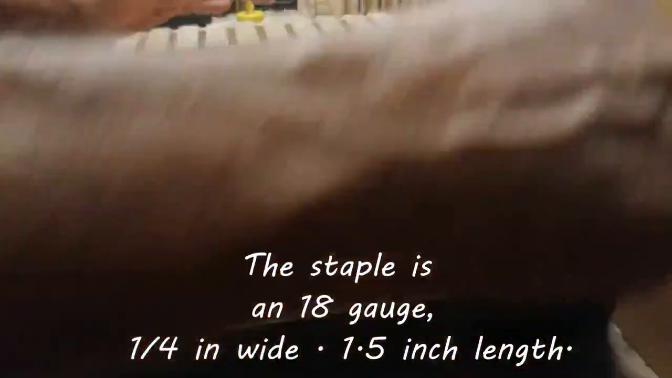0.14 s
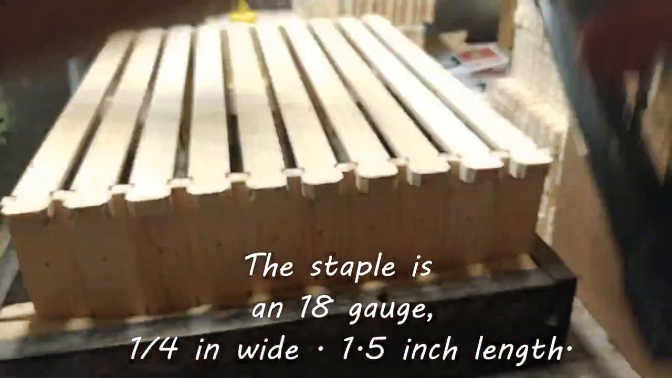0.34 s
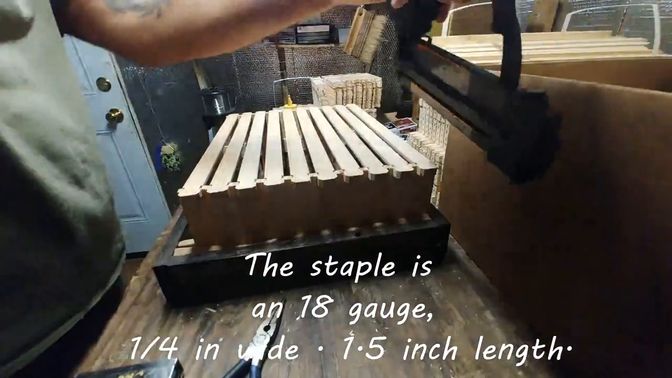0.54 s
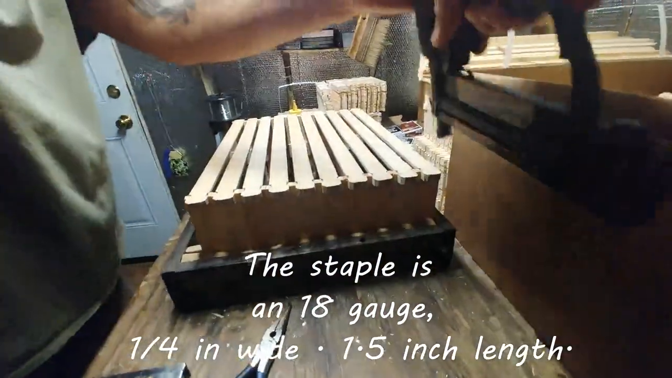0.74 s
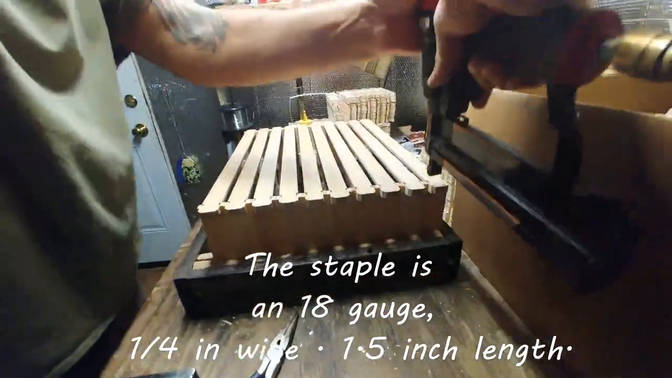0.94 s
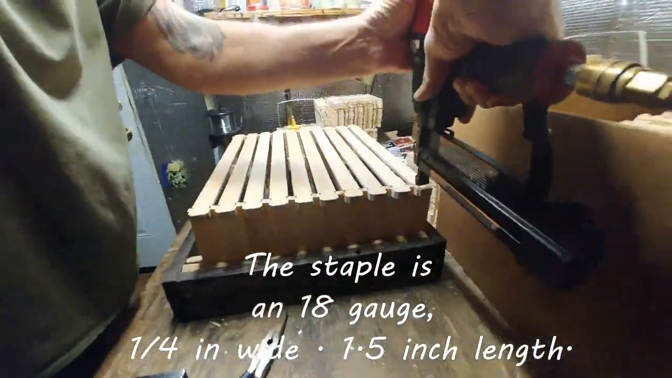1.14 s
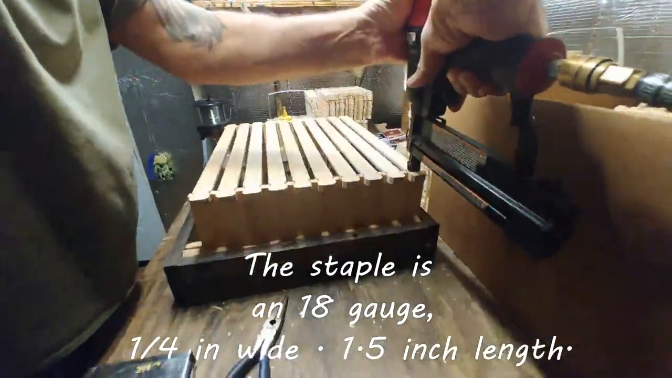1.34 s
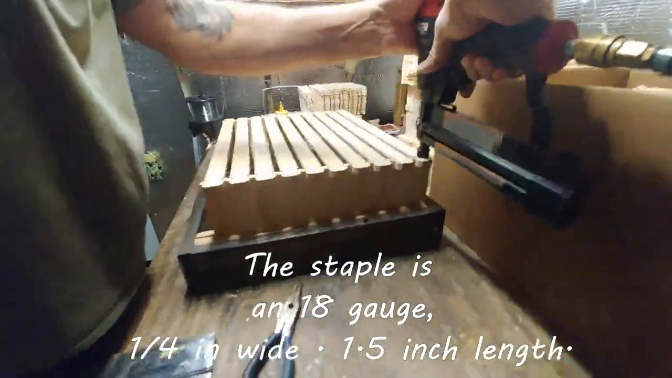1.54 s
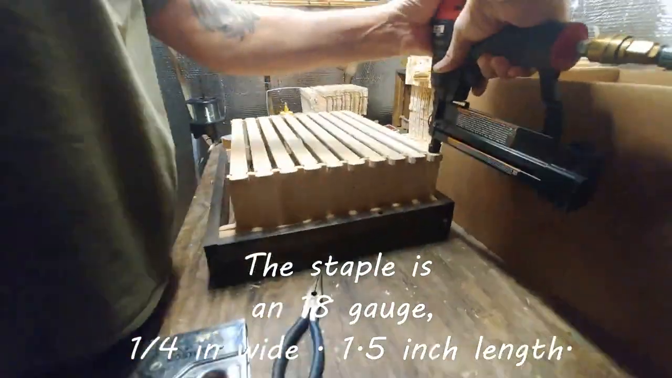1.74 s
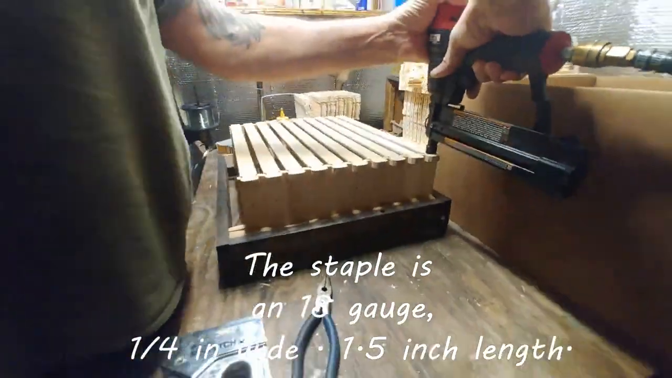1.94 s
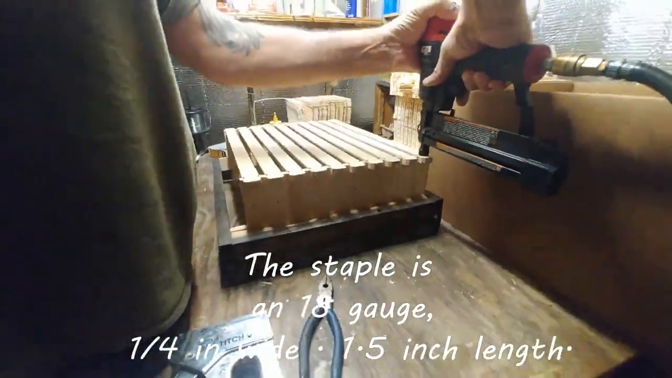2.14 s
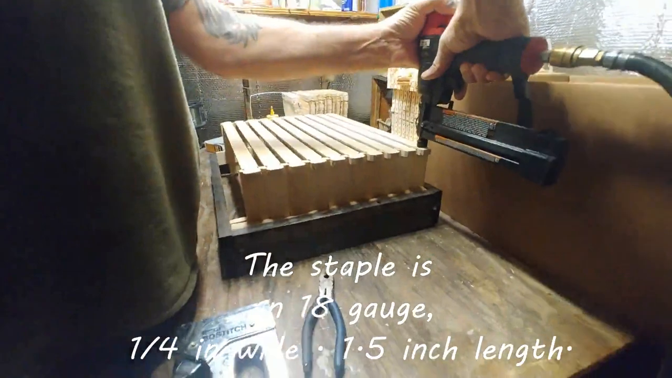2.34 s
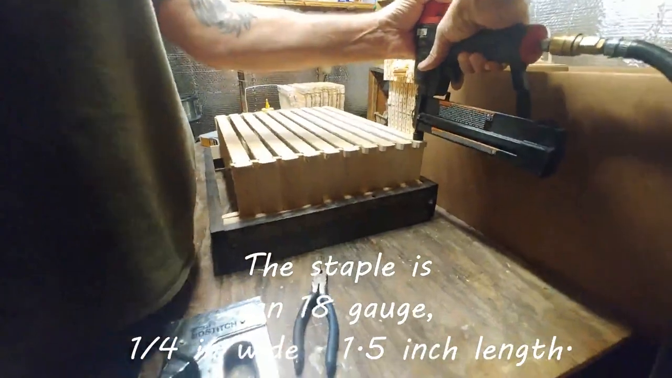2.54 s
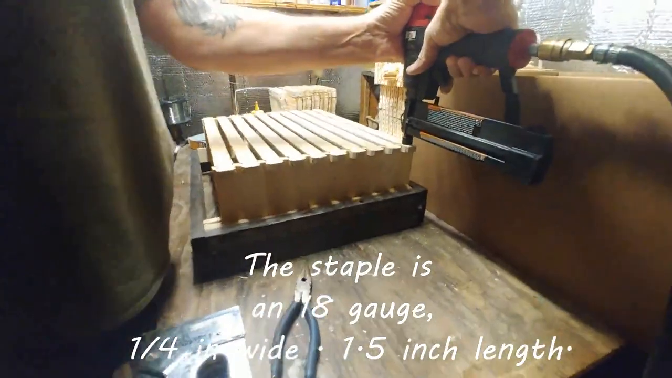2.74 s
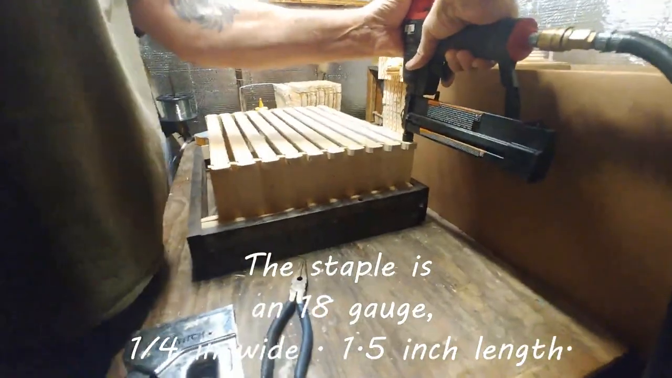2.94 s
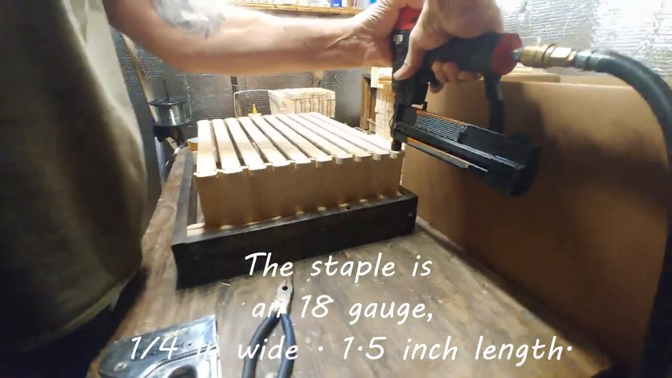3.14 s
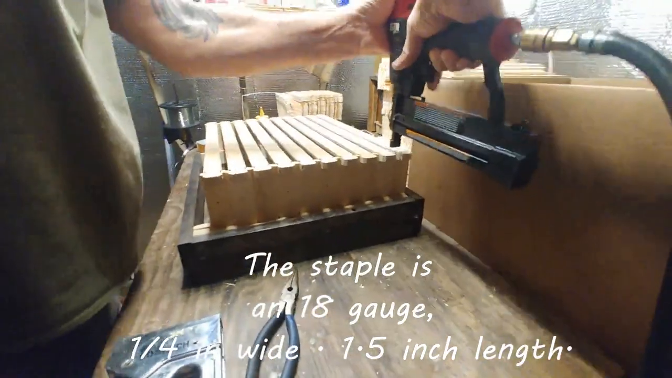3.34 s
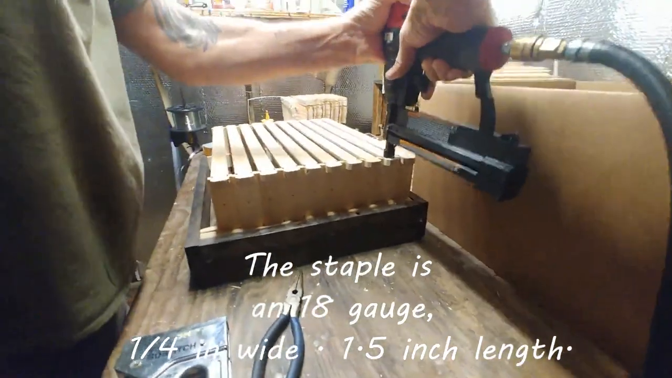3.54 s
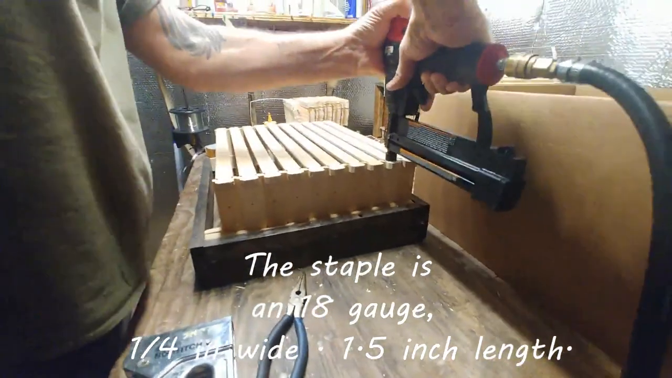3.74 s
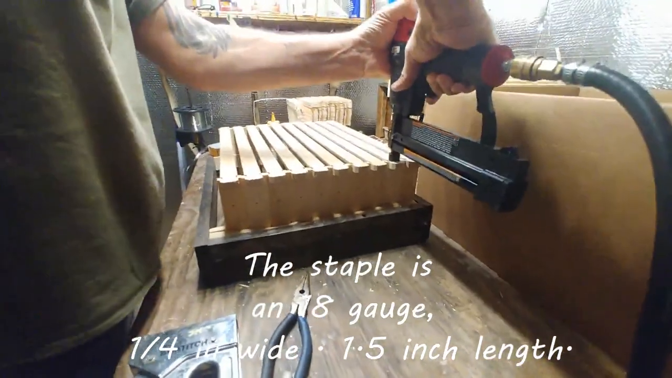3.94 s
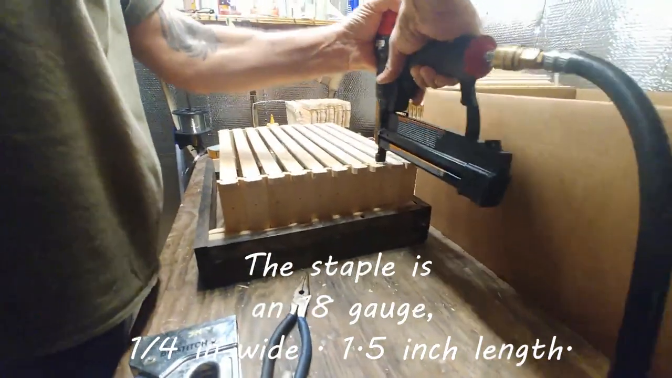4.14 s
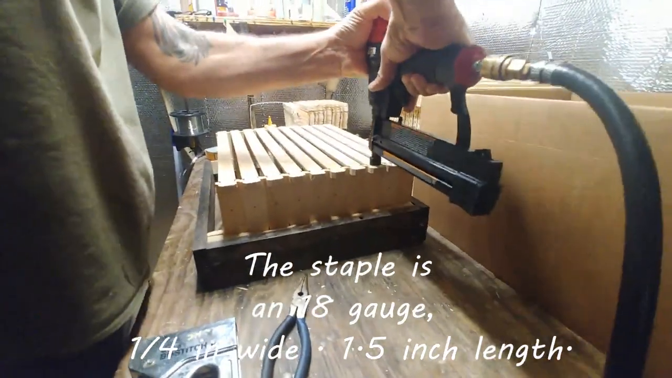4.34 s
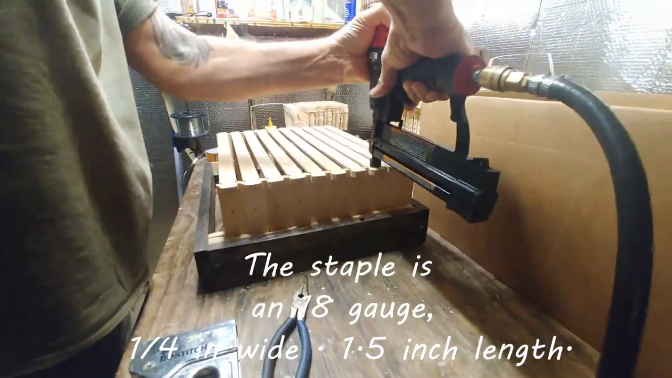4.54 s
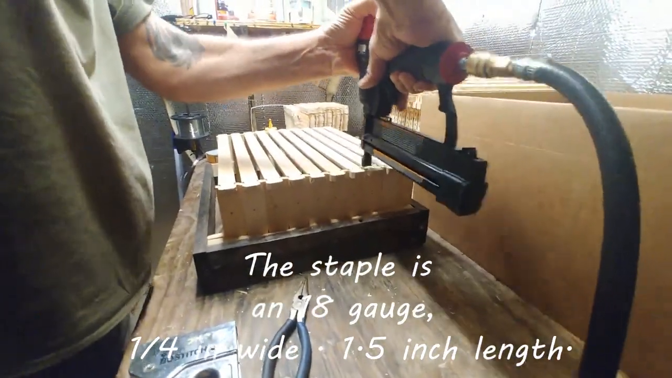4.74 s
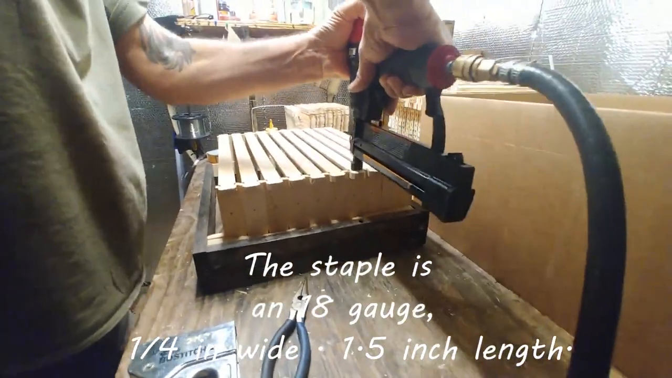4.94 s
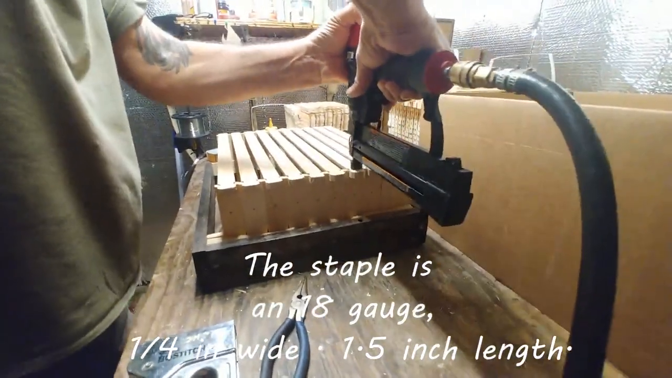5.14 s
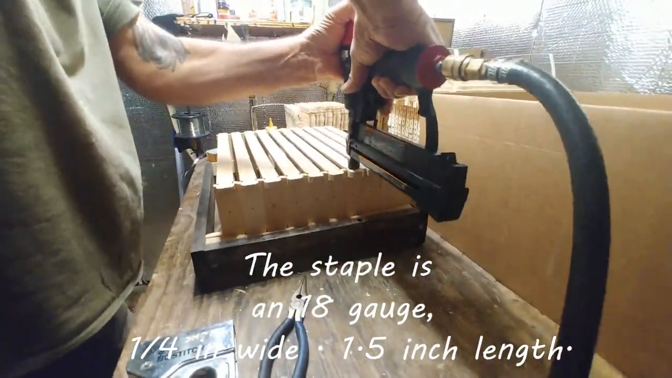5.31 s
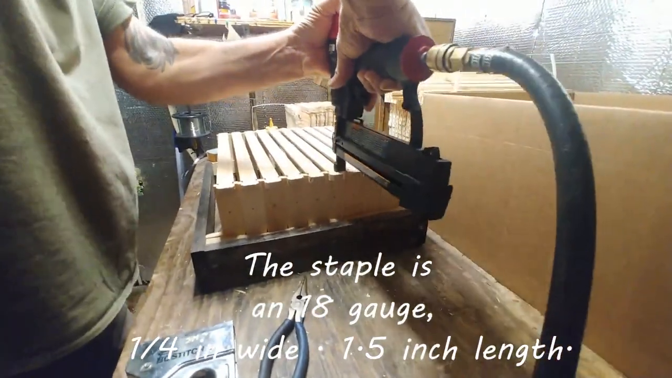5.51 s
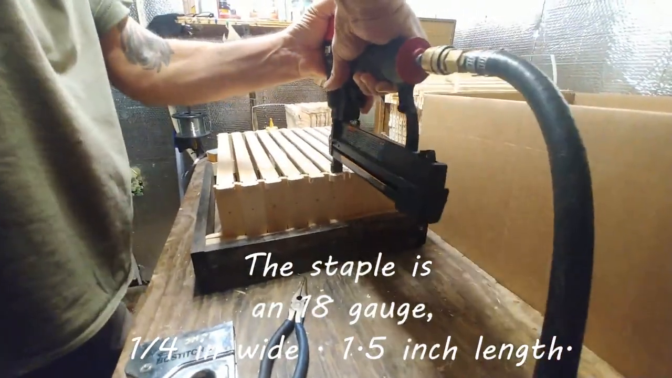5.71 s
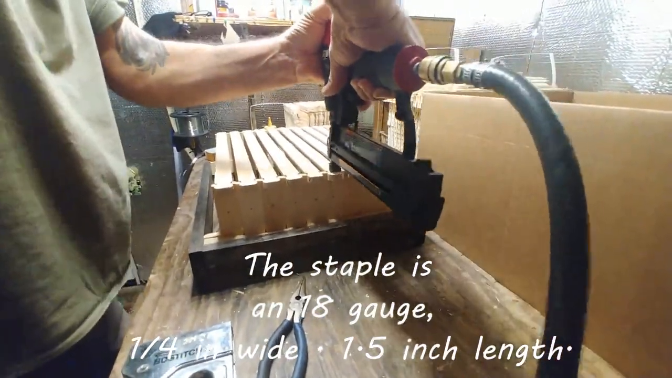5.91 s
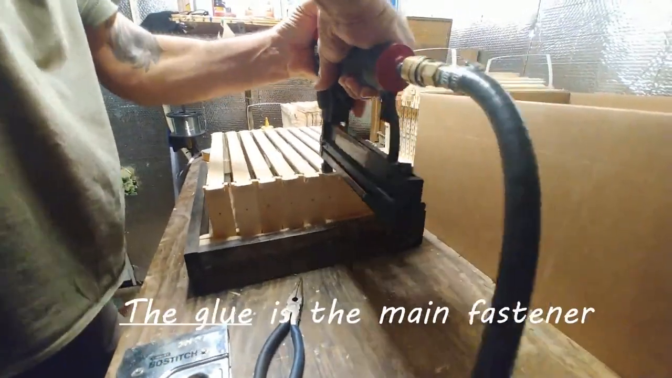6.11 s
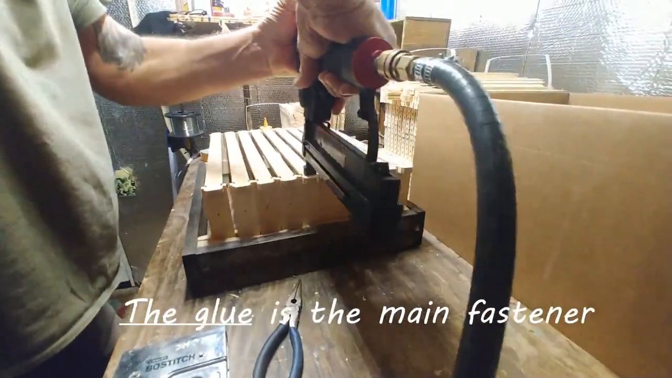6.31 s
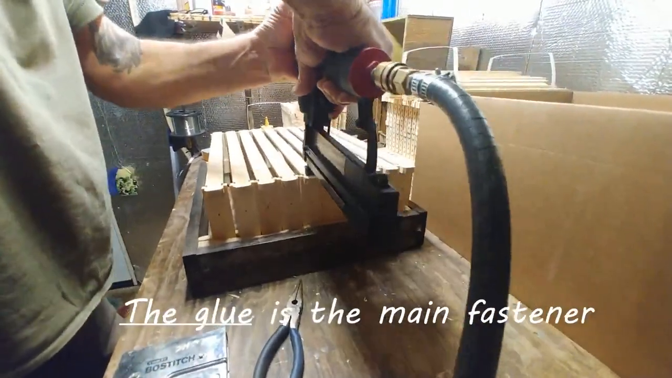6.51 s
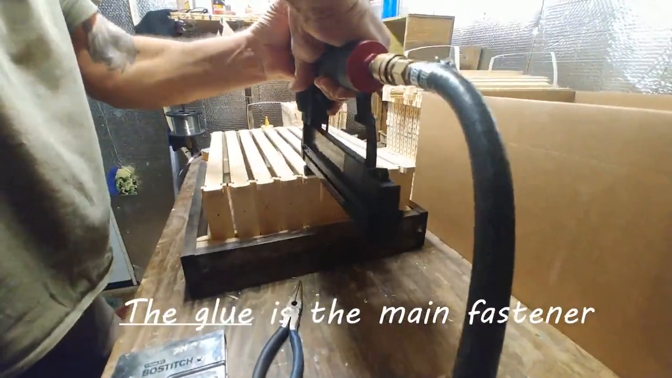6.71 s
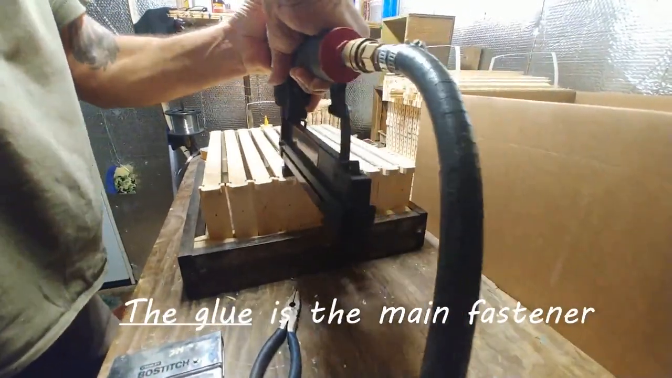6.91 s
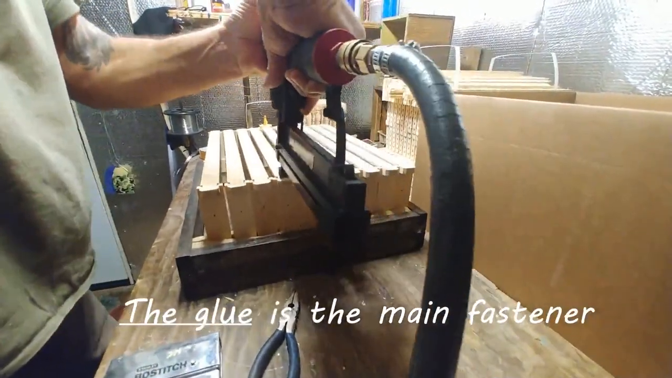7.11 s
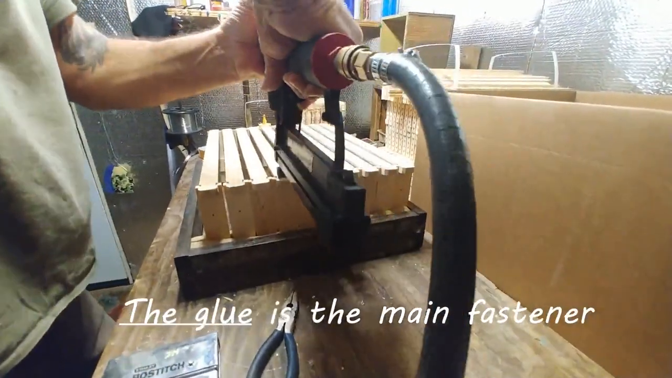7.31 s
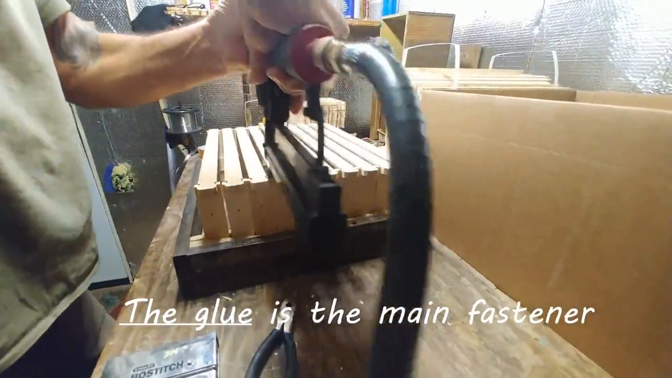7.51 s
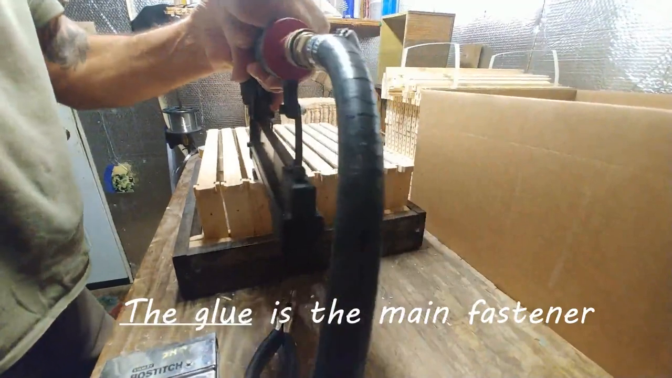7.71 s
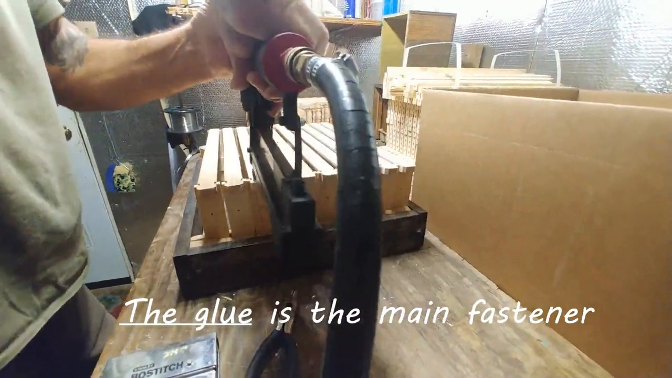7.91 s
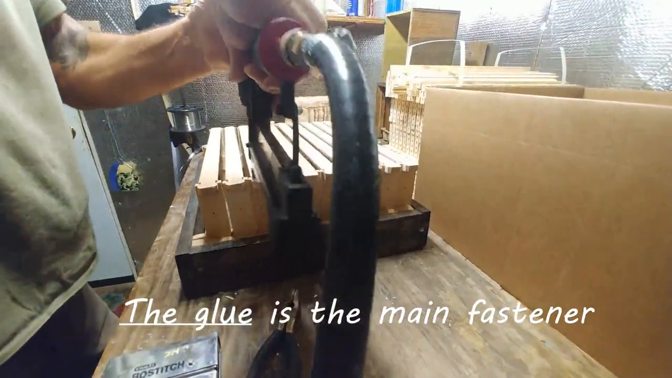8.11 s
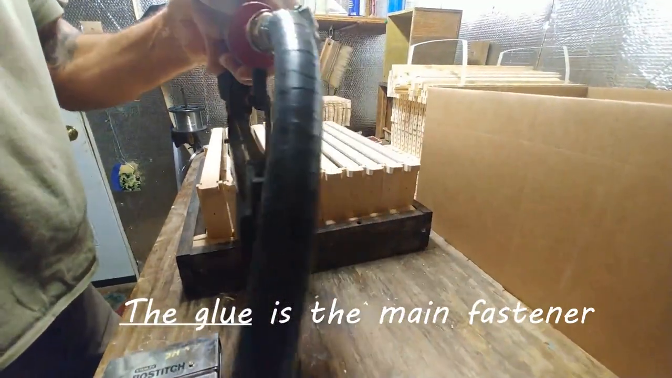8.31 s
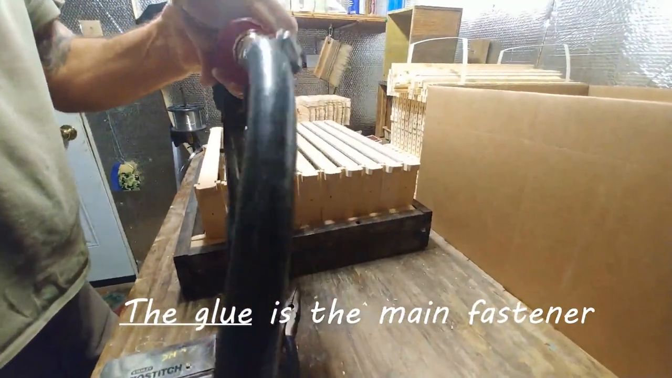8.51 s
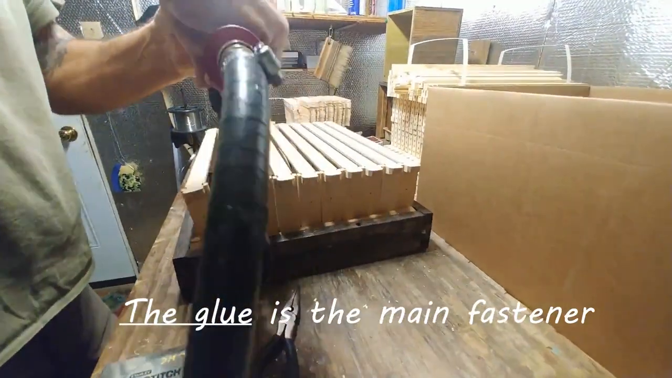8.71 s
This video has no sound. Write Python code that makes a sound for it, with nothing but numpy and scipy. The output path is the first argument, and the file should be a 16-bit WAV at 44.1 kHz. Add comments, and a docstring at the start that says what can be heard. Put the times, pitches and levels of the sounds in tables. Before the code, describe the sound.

After three seconds of quiet knocking and rustling, an air stapler cracks nine times at near-steady intervals, puffing out air after each blow.

```python
"""Small workshop: an air stapler drives nine staples into softwood frames on a bench, a hand's length away.
At first the camera is shifted by hand; the nose taps and slides on the wood, with more taps between shots.
Each shot: air rushes in (ringing noise), the driver slams and rebounds (damped sines), frame, bench and steel ring.
On release the exhaust pops and hisses (coloured noise) and the piston clacks back. The room adds decaying noise tails."""
import sys
import numpy as np
from scipy import signal
from scipy.fft import rfft, irfft, next_fast_len
from scipy.io import wavfile

SR = 44100
rng = np.random.default_rng(int(sys.argv[2]) if len(sys.argv) > 2 else 0)


def digitize_waveform(pressure):
    """Quantize a signal to 16-bit integers and store it at the path in sys.argv[1].

    Rows of a 2-D input are taken as channels; values are limited to [-1, 1].
    """
    field = np.atleast_2d(pressure).T
    bounded = np.clip(field, -1, 1)
    quanta = np.round(bounded * 32767).astype(np.int16)
    wavfile.write(sys.argv[1], SR, quanta)


def to_linear_factor(level_db):
    """Convert decibel levels (scalar or array-like) to linear amplitude factors."""
    exponent = np.asarray(level_db, float) / 20
    return 10 ** exponent


N = 390726
HZ = np.fft.rfftfreq(N, 1 / SR) + 1   # +1 keeps the logarithm finite

# shots, timed at the onset of the air rush: start_s, blow_db, rush_hz, stroke_ms, leak_db
SHOTS = [(3.2160, -2, 4300, 8.2, -45), (3.9679, -2, 3700, 7.2, -50), (4.6010, -2.5, 4300, 7.7, -52),
         (5.2293, -3, 3000, 7.6, -49), (6.0058, -3.5, 3700, 7.3, -54), (6.6607, -3.5, 2700, 7.4, -52),
         (7.3952, -2.5, 2900, 7.4, -29), (8.0278, -2, 3400, 7.3, -58), (8.7098, -3, 3250, 6.9, -58)]
# trigger releases: start_s, exhaust_db, clack_db
RELEASES = [(3.3148, -7.5, -18.5), (4.0902, -6, -14.5), (4.7159, -7.5, -17.5), (5.364, -7, -18),
            (6.1184, -7.5, -15), (6.8002, -7.5, -16), (7.5318, -7.5, -20), (8.1406, -7.5, -16.5),
            (8.841, -5, -14)]
# nose, trigger and hands on wood and steel: start_s, knock_db, knock_hz, tick_db, bright_minus_dull_db
TAPS = [(0.082, -32.5, 416, -46.5, -2), (0.249, -32.5, 433, -38, -17), (0.457, -19.5, 296, -42.5, -5),
        (0.526, -26.5, 338, -57, 2), (0.631, -39, 410, -53.5, 6.5), (0.798, -43.5, 250, -45.5, 12),
        (1.01, -61, 288, -46, -0.5), (1.457, -47.5, 480, -64, -12), (1.475, -34, 760, -35.5, -0.1),
        (2.066, -44.5, 556, -38.5, -5), (2.138, -55, 840, -50, 0.5), (2.276, -22, 260, -30.5, -5),
        (2.305, -37, 510, -40.5, -13), (2.761, -33, 431, -35, -7.5), (2.778, -43.5, 420, -41, -2),
        (2.837, -47, 652, -32, -5), (3.066, -42, 487.4, -44.5, -13), (3.074, -27.5, 440, -42.5, -13),
        (3.107, -45.5, 334, -33, 7), (3.162, -52, 699, -40.5, -2), (3.170, -31.5, 415, -31.5, -0.5),
        (3.641, -39, 561, -45, 6), (3.693, -41.5, 322, -51, 7.5), (3.79, -30, 244, -59, -20),
        (3.914, -54, 1140, -40, -0.2), (4.315, -41, 264, -43, 3.5), (4.483, -24.5, 264, -44, 5.5),
        (4.514, -38.5, 410, -38.5, -2.8), (4.998, -43, 503, -41, -1.2), (5.122, -39, 414, -51, -7.5),
        (5.143, -25, 320, -32, 0.5), (5.574, -49.5, 418, -44, 1.9), (5.885, -47, 250, -59, 0),
        (5.922, -25.5, 345, -35.5, 5.5), (5.949, -27.5, 393, -37, -8), (6.36, -46.5, 412, -45.5, -3.5),
        (6.54, -45, 336, -51.5, -3), (6.57, -25.5, 323, -37, 2), (7.255, -41.5, 315, -51.5, -3.5),
        (7.75, -54, 336, -44, -8), (7.962, -27.5, 317, -35, -2.5), (8.493, -43.5, 930, -45.5, -4.5),
        (8.604, -35.5, 296, -44.5, 0), (8.622, -34.5, 427, -39, -12)]
# camera shifted by hand: time_s, rustle_db, scuff_db, rumble_db
HANDLING = [(0.0, -62.5, -68.5, -74), (0.102, -54.5, -59.5, -38.5), (0.24, -50, -53, -44),
            (0.255, -48.5, -45.5, -47.5), (0.36, -48.5, -52.5, -47.5), (0.395, -37.5, -44.5, -41.5),
            (0.425, -42.5, -50.5, -45), (0.445, -55.5, -53.5, -41.5), (0.475, -52, -43, -29),
            (0.612, -70, -59, -44.5), (0.636, -56.5, -48, -40.5), (0.72, -48, -50.5, -35.5),
            (0.78, -55.5, -61.5, -50), (0.912, -53.5, -51, -44.5), (1.004, -57.5, -60, -44.5),
            (1.14, -94, -82, -69.5)]
# camera case bumped and creaking: start_s, level_db, left_minus_right_db, pitch_hz, t60_s
CASE_BUMPS = [(0.713, -24, -13, 71.7, .05), (.977, -24, 17.5, 943, 0.0026)]
# nose sliding along the wood: time_s, level_db
SLIDE = [(2.42, -66), (2.47, -53), (2.5, -46.5), (2.526, -36.5), (2.72, -37), (2.785, -47.5), (2.81, -67)]
# low unrest of the bench: time_s, level_db
UNREST = [(0.0, -63), (0.9, -49), (1.2, -61.5), (1.85, -67), (2.34, -55.5), (3.1, -59.5), (3.6, -62.5),
          (3.75, -49.5), (4.2, -58), (8.86, -58)]

# modes of the free frame: pitch_hz, level_db, t60_s
FRAME = [(252, -9, 0.22), (312.6, -4, 0.14), (412, -4, 0.17), (434.8, -5.5, 0.26), (602, 7.5, 0.0069),
         (808, -2, 0.096), (529, -7, 0.26), (881.5, 2, 0.12), (1005, 4, 0.064), (1176, 5.5, 0.025),
         (1282, 2, 0.055), (1770, -1, 0.035), (1990, -10, 0.019), (2620, -15.5, .03)]
# modes of the bench: pitch_hz, level_db, t60_s
BENCH = [(72.5, -11.5, 0.22), (127.9, 1.5, 0.26), (165, -4, 0.15), (193, -12, 0.46)]
# modes of the steel tool body: pitch_hz, level_db, t60_s
STEEL = [(904, -7, 1.4), (1131, -5, 1.5), (1138, 0, 1.8), (1556, -12, 1.2), (1771, -10, 1.2),
         (2288, -12, 1.2), (3461, -2, 1.6), (3558, -4, 1.4), (4657, -6, .9)]

# exhaust jet spectrum: freq_hz, density_db_per_hz
EXHAUST = [(88, -29), (150, -15.5), (264, -16.5), (637, -14), (1040, -6.5), (1630, -8), (2360, -1),
           (2810, -9), (3770, 0.5), (4950, -2.5), (6390, -12), (7320, -8), (8560, -5), (11900, -20),
           (16000, -37.5)]
# blow and clack spectrum: freq_hz, density_db_per_hz
BLAST = [(180, -19), (300, -9), (787, -9), (1150, -3.5), (1280, -14), (1410, -14.5), (1970, 0.5),
         (2840, -8.5), (4670, -5.5), (6410, -24), (8090, -14.5), (10900, -21.5), (16000, -59)]
# hiss of the valve cracking open, spectrum: freq_hz, density_db_per_hz
VALVE_HISS = [(880, -49), (1500, -10.5), (3000, -6), (3450, 7), (6630, -23), (7170, -7.5), (9100, -11.5),
              (14300, -47.5), (16000, -70)]
# air past a badly seated valve, spectrum: freq_hz, density_db_per_hz
SEEP = [(880, -44), (1500, -13.5), (3000, -19), (3450, -9.5), (6630, -10), (7170, -4), (9100, -1),
        (14300, -24), (16000, -69)]
# rustle on the camera case, spectrum: freq_hz, density_db_per_hz
RUSTLE = [(820, -25.5), (1400, -5.5), (2210, -1), (2520, -3.5), (3870, -6.5), (5780, -12), (6280, -24.5),
          (8010, -18.5), (11200, -33), (13000, -51)]
# scuff on the camera case, spectrum: freq_hz, density_db_per_hz
SCUFF = [(160, -42.5), (280, -7), (387, -4), (437, -4.5), (612, -7), (774, -7.5), (1030, -10), (1400, -13),
         (1820, -51), (3080, -120)]
# handling rumble spectrum: freq_hz, density_db_per_hz
KNEAD = [(15, -38), (25, -5.5), (65, 6), (97, -14.5), (134, 7), (201, -10.5), (280, -11), (360, -56.5),
         (620, -120)]
# nose rubbing on wood, spectrum: freq_hz, density_db_per_hz
RUB = [(180, -65), (300, -27.5), (555, -19), (737, -7), (995, -18), (1160, -1.5), (1260, -9), (2120, 3.5),
       (2770, -6), (4890, -2.5), (6600, -21.5), (7730, -14), (8900, -18), (12200, -38), (13000, -86)]
# dull tick spectrum: freq_hz, density_db_per_hz
DULL_TICK = [(800, -23.5), (1400, -2.5), (2200, 2.5), (2800, -2), (3600, 0.5), (4300, -6), (5500, -34)]
# bright tick spectrum: freq_hz, density_db_per_hz
BRIGHT_TICK = [(3200, -31.5), (4300, 2.5), (5400, 3.5), (6400, -11), (8200, -6.5), (11500, -12.5),
               (13000, -54)]
# bench unrest spectrum: freq_hz, density_db_per_hz
LOWS = [(12, -44), (20, -16), (69, 8.5), (97, -2.5), (129, 4.5), (146, -24), (182, -6.5), (210, -17),
        (260, -10.5), (340, -34.5), (570, -120)]
# room air spectrum: freq_hz, density_db_per_hz
AIR = [(88, -25.5), (150, -7.5), (368, -7), (656, -10), (1090, -14.5), (2210, -17), (4010, -24.5),
       (4570, -20), (6390, -36.5), (8620, -32.5), (13000, -44.5)]

# diffuse sound: freq_hz, left_right_likeness (0 to 1)
LIKENESS = [(60, 0.17), (130, 1), (290, 0.93), (640, 1), (1410, 0.23), (3100, 0.089), (6820, 0.024),
            (15000, 0.84)]
# microphone ports: freq_hz, left_minus_right_db
PORTS_DB = [(60, -3), (110, -3), (200, 2), (380, 0.5), (700, -1), (1290, 1.5), (2380, -5), (4400, 1.5),
            (8120, 9.5), (15000, -1.5)]
# microphone ports: freq_hz, left_lead_rad
PORTS_RAD = [(0, 0.5), (1030, 1), (1980, 0.36), (2330, 0.76), (2760, 5.5), (3620, 6.5), (4740, 8.5),
             (5510, -3.5), (8700, 0.5), (9300, 7.5), (12600, 5.5), (13100, 1), (13400, 7), (15900, 6)]
# reverberation: freq_hz, t60_s
ROOM_T60 = [(100, 0.27), (400, 0.32), (1200, 0.32), (3000, 0.3), (8000, 0.27), (14000, 0.26)]

AIR_DB = -69
SHUDDER_DB, SHUDDER_RISE_MS, SHUDDER_FALL_MS = -58.5, 27, 32
HELD_FRAME_RING = 0.52   # share of free t60 left under the hand
FIDGETS, FIDGET_MIN_DB, FIDGET_RANGE_DB = 14, -66, 8.0
BOUNCE_LOSS_DB = 11.0    # per bounce, before scatter
BENCH_UNDER_KNOCK_DB, BENCH_LOSS_DB_PER_OCTAVE = 9.0, 8.5   # first holds at 260 Hz
TICK_RISE_MS, TICK_HOLD_MS, TICK_FALL_MS = 1.2, 2.2, 2.0
CRACK_T60_S = 0.002
TAP_LEFT_DB, LEFT_PER_BRIGHT_DB = 1.5, 0.24   # bright ticks sit further left
TOOL_IN_ROOM_DB, TAPS_IN_ROOM_DB = -5.5, -7
STEEL_UNDER_BLOW_DB = 58.5
RETURN_MS = 42.0         # piston's way home
MIC_TOP_HZ = 15800

START_S, BLOW_DB, RUSH_HZ, STROKE_MS, LEAK_DB = np.transpose(SHOTS)
HIT_S = START_S + STROKE_MS / 1000
RELEASE_S, EXHAUST_DB, CLACK_DB = np.transpose(RELEASES)


def at_hz(points, hz):
    """Reads a spectrum on a log-frequency axis."""
    freq_hz, value = np.transpose(points)
    return np.interp(np.log(hz), np.log(freq_hz), value)


def in_time(rows):
    """Gains from the dB columns of a curve, silent outside it."""
    time_s, *columns_db = np.transpose(rows)
    t = np.arange(N) / SR
    return [to_linear_factor(np.interp(t, time_s, db, left=-120, right=-120)) for db in columns_db]


def noise(spectrum, width=0.94):
    """Coloured stereo noise of rms 1; width 0 is the same in both channels."""
    mid, side = rfft(rng.standard_normal((2, N))) * to_linear_factor(at_hz(spectrum, HZ))
    alike = 1 - np.clip(width, 0, 1) * (1 - np.clip(at_hz(LIKENESS, HZ), 0, 1))
    x = irfft(np.sqrt(1 + alike) * mid + np.sqrt(1 - alike) * side * [[1], [-1]], N)
    return x / np.sqrt(np.mean(x ** 2))


def flicker(rate_hz, depth_db):
    """Uneven gain wandering at about the given rate."""
    knots = rng.standard_normal(4000)
    return to_linear_factor(depth_db * np.interp(np.arange(N) * rate_hz / SR, np.arange(4000), knots))


def clicks(start_s, level_db):
    """One impulse per event."""
    out = np.full(N, 1e-18)
    i = np.minimum((np.asarray(start_s) * SR).astype(int), N - 1)
    np.add.at(out, i, to_linear_factor(level_db))
    return out


def ring(x, hz, t60_s):
    """Two-pole resonator: a unit click starts a damped sine of height 1."""
    r, w = to_linear_factor(-60 / (t60_s * SR)), 2 * np.pi * hz / SR
    return signal.lfilter([0, np.sin(w)], [1, -2 * r * np.cos(w), r * r], x)


def soften(x, hz):
    """Yielding contact: two one-pole low-passes."""
    r = np.exp(-2 * np.pi * hz / SR)
    return signal.lfilter([(1 - r) ** 2], [1, -2 * r, r * r], x)


def strike(modes, start_s, level_db, spread_db=5.5, focus_hz=None):
    """Each blow excites all modes of a body at random strengths, alternating in sign, most near its focus."""
    luck_db = spread_db * rng.standard_normal((len(start_s), len(modes)))
    out = 0
    for k, (hz, mode_db, t60_s) in enumerate(modes):
        off_db = 0 if focus_hz is None else -9.0 * np.abs(np.log2(hz / focus_hz))
        hits = clicks(start_s, level_db + mode_db + off_db + luck_db[:, k])
        out = out + (-1) ** k * ring(hits, hz, t60_s)
    return out


def swell(start_s, level_db, rise_ms, hold_ms, fall_ms, sag=0.0):
    """Envelopes that rise, sag until hold_ms after the start, then die away."""
    out = np.zeros(N)
    for start, gain, hold in np.broadcast(start_s, to_linear_factor(level_db), hold_ms):
        t_ms = np.arange(int((hold + 12 * fall_ms) * SR / 1000)) / SR * 1000
        rise = np.minimum(t_ms / rise_ms, 1) ** 2
        shape = rise * np.exp(-sag * t_ms / hold - np.maximum(t_ms - hold, 0) / fall_ms)
        i = min(int(start * SR), N)
        out[i:i + len(t_ms)] += gain * shape[:N - i]
    return out


def room_air():
    """Quiet air of the room: steady coloured noise, slightly uneven."""
    return to_linear_factor(AIR_DB) * flicker(27, 0.9) * noise(AIR)


def bench_unrest():
    """Low noise of the bench, which also shudders after every shot."""
    shudder = swell(START_S, SHUDDER_DB, SHUDDER_RISE_MS, SHUDDER_RISE_MS, SHUDDER_FALL_MS)
    return (in_time(UNREST)[0] + shudder) * flicker(60, 0.9) * noise(LOWS)


def hands():
    """Skin and cloth rub the camera's case in fits: three flickering noises."""
    rustle, scuff, rumble = in_time(HANDLING)
    rustling = rustle * flicker(45, 2.9) * flicker(500, 2.5) * noise(RUSTLE)
    scuffing = scuff * flicker(60, 3.0) * flicker(250, 2.8) * noise(SCUFF)
    rumbling = rumble * to_linear_factor(-4.5) * flicker(30, 2.2) * noise(KNEAD)
    return rustling + scuffing + rumbling


def fidgets():
    """Faint stray touches of hands and hose at random moments, as rows like the taps."""
    span = [N / SR - 0.1, FIDGET_RANGE_DB, 400, FIDGET_RANGE_DB, 12.0]
    lowest = [0, FIDGET_MIN_DB, 300, FIDGET_MIN_DB, -6.0]
    return rng.random((FIDGETS, 5)) * span + lowest


def taps():
    """Contacts with two quick bounces ring frame and bench; steel parts rattle briefly as noise ticks."""
    first = np.vstack([TAPS, fidgets()])
    first = first[np.argsort(first[:, 0])]
    luck = rng.random((len(first), 4))
    contacts = [first]
    for k in (0, 1):
        delay_s = (0.003 + 0.01 * luck[:, k]) * (k + 1)
        loss_db = BOUNCE_LOSS_DB * (k + 1) + 1.3 * luck[:, k + 2]
        contacts.append(first + np.outer(delay_s, [1, 0, 0, 0, 0]) - np.outer(loss_db, [0, 1, 0, 1, 0]))
    s, knock_db, knock_hz, tick_db, bright_db = np.vstack(contacts).T
    first_s, first_knock_db, first_hz, first_tick_db, first_bright_db = first.T

    held_frame = np.array(FRAME) * [1, 1, HELD_FRAME_RING]
    wood = soften(strike(held_frame, s, knock_db - 3.0, 3.6, knock_hz), 1500)
    # higher knocks reach the bench less
    bench_db = first_knock_db - BENCH_UNDER_KNOCK_DB - BENCH_LOSS_DB_PER_OCTAVE * np.log2(first_hz / 260)
    bench = soften(strike(BENCH, first_s, bench_db, 0.94), 270)
    dull = noise(DULL_TICK, 1.0) * swell(s, tick_db, TICK_RISE_MS, TICK_HOLD_MS, TICK_FALL_MS)
    bright = noise(BRIGHT_TICK, 1.0) * swell(s, tick_db + bright_db, TICK_RISE_MS, TICK_HOLD_MS, TICK_FALL_MS)
    crack = ring(clicks(first_s + 0.00092, first_tick_db + 3.6), 2900, CRACK_T60_S)   # onset of contact

    left_db = TAP_LEFT_DB + LEFT_PER_BRIGHT_DB * first_bright_db
    half_db = np.interp(np.arange(N) / SR, first_s, left_db) / 2
    return (wood + bench + crack + flicker(700, 3.5) * (dull + bright)) * to_linear_factor([half_db, -half_db])


def workshop(x):
    """Diffuse reverberation: noise in octave bands with their own decay, a new tail from just before each shot."""
    size = SR * 3 // 4
    places = N // size
    t, tails = np.arange(size) / SR, 0
    white = noise([(20, 0), (20000, 0)])
    for low_hz in 62.5 * 2. ** np.arange(8):
        octave = signal.butter(2, [low_hz, 2 * low_hz], "band", fs=SR, output="sos")
        band = signal.sosfilt(octave, white)
        fade = to_linear_factor(-60 * t / at_hz(ROOM_T60, np.sqrt(2) * low_hz))
        tails = tails + band[:, :places * size].reshape(2, places, size) * fade
    tails = tails * np.minimum(t / 0.0077, 1)   # first walls answer after some ms
    moves = [0] + [int((s - 0.05) * SR) for s in START_S] + [N]
    out = np.zeros((2, N + size))
    for k, (i, j) in enumerate(zip(moves, moves[1:])):
        tail = tails[:, k] / np.sqrt(np.sum(tails[:, k] ** 2) / 2)
        out[:, i:j + size - 1] += signal.fftconvolve(x[:, i:j].mean(axis=0)[None], tail, axes=1)
    return out[:, :N]


def case_bumps():
    """The camera's case is bumped and creaks: panned damped sines."""
    out = 0
    for start_s, level_db, pan_db, hz, t60_s in CASE_BUMPS:
        out = out - ring(clicks([start_s], level_db), hz, t60_s) * to_linear_factor([[pan_db / 2], [-pan_db / 2]])
    return out


def nose_slide():
    """The nose slides over the wood: flickering friction noise."""
    return in_time(SLIDE)[0] * flicker(150, 1.2) * noise(RUB)


def air_rush():
    """The valve cracks open and air whistles into the cylinder: noise through resonators."""
    white, whistles = rng.standard_normal((2, N)), np.zeros(N)
    # the harder the rush, the harder the blow: both follow BLOW_DB
    for start, db, ms, hz in zip(START_S, BLOW_DB, STROKE_MS, RUSH_HZ):
        i = slice(int(start * SR) - 40, int(start * SR) + 2000)
        # main whistle, then two fixed cavities of the head
        whistle = ring(white[0, i], hz, 0.0052)
        whistle = whistle + 0.11 * ring(white[1, i], 1800, 0.004) + 0.5 * ring(white[1, i], 4600, 0.0072)
        envelope = swell([start - 0.0008], db - 7.5, 2.5, ms - 3.6, 1.6, 0.1)
        whistles[i] = whistle / whistle.std() * envelope[i]
    # the valve's hiss leads the rush
    crack_hiss = noise(VALVE_HISS) * swell(START_S - 0.014, BLOW_DB - 32.0, 14.0, 19.0, 2.5)
    inrush = noise(EXHAUST) * swell(START_S, BLOW_DB - 13.0, 0.85, 2.9, 3.8)
    first_slug = soften(ring(clicks(START_S - 0.001, BLOW_DB - 11.0), 200, 0.008), 600)
    return crack_hiss + inrush + first_slug + whistles


def driver_blow():
    """The driver hits its bumper and rebounds: damped sines, suction first, plus a noise blast."""
    bumper = -ring(ring(clicks(HIT_S, BLOW_DB - 20.0), 1500, 0.0077), 1099, 0.011)
    slam = -ring(clicks(HIT_S, BLOW_DB), 2150, 0.0032)
    rebound = ring(clicks(HIT_S + 0.0036, BLOW_DB - 9.5), 1500, 0.00067)
    rebound = rebound + ring(clicks(HIT_S + 0.0047, BLOW_DB - 2.0), 4200, 0.0044)
    envelope = swell(HIT_S + 0.00067, BLOW_DB - 14.5, 0.43, 8.6, 18.0)
    blast = noise(BLAST, 1.0) * flicker(400, 3.3) * envelope
    return bumper + slam + rebound + blast


def shot_ringing():
    """Held frame, bench and steel body ring on after the shot as sums of modes."""
    held_frame = np.array(FRAME) * [1, 1, HELD_FRAME_RING]
    frame = strike(held_frame, HIT_S + 0.0015, BLOW_DB - 19.5, 5.5)
    bench = soften(strike(BENCH, START_S, BLOW_DB - 19.5, 2.8), 220)
    steel = strike(STEEL, HIT_S, BLOW_DB - STEEL_UNDER_BLOW_DB, 2.5)
    return frame + bench + steel * flicker(16.0, 3.5)   # the steel's ringing wavers in level


def valve_leak():
    """A badly seated valve hisses until the trigger is let go."""
    held_ms = 1000 * (RELEASE_S - HIT_S)
    return noise(SEEP) * swell(HIT_S, LEAK_DB, 7.4, held_ms, 8.0, 0.17)


def releases():
    """The exhaust port pops open and hisses; the piston clacks back against the cap as the hiss fades."""
    envelope = swell(RELEASE_S, EXHAUST_DB - 9.0, 8.5, RETURN_MS, 21.0, 0.55)
    jet = flicker(250, 2.6) * noise(EXHAUST, 0.78) * envelope
    pop = ring(ring(clicks(RELEASE_S, EXHAUST_DB - 31.0), 120, 0.031), 320, 0.0027)
    home_s = RELEASE_S + RETURN_MS / 1000
    clack = noise(BLAST, 0.46) * swell(home_s, CLACK_DB - 15.0, 1.0, 8.2, 3.0)
    clack = clack + ring(clicks(home_s, CLACK_DB - 0.5), 1100, 0.02)
    kick = soften(strike(BENCH, RELEASE_S, EXHAUST_DB - 23.0, 2.5), 250)   # tool jerks on the bench
    return jet + pop + clack + kick


def scene():
    """Tool and wood in the room, over handling noise and quiet air."""
    no_subs = signal.butter(4, 55, "high", fs=SR, output="sos")
    shots = air_rush() + driver_blow() + shot_ringing() + valve_leak()
    tool = signal.sosfilt(no_subs, shots + releases())
    wood = soften(signal.sosfilt(no_subs, taps()), 10000)
    quiet = room_air() + bench_unrest()
    room = workshop(to_linear_factor(TOOL_IN_ROOM_DB) * tool + to_linear_factor(TAPS_IN_ROOM_DB) * wood)
    handling = hands() + case_bumps() + nose_slide()
    return tool + wood + room + handling + quiet


def low_pass(x):
    """Removes everything above the highest recorded frequency."""
    return signal.sosfilt(signal.butter(12, 16390, fs=SR, output="sos"), x)


def record(dry):
    """Two microphone ports differ in level and phase; peaks are rounded and clipped, the top is cut."""
    size = next_fast_len(N + SR // 4)
    hz = np.fft.rfftfreq(size, 1 / SR) + 1
    half_db = at_hz(PORTS_DB, hz) / 2
    half_turn = np.exp(.5j * np.interp(hz, *np.transpose(PORTS_RAD)))
    spectrum = rfft(dry, size) * to_linear_factor([half_db, -half_db]) * [half_turn, half_turn.conj()]
    ports = irfft(spectrum, size)[:, :N]
    rounded = np.clip(1.697 * np.tanh(ports / 1.445), -1, 1)
    top = signal.butter(10, MIC_TOP_HZ, fs=SR, output="sos")
    mix = signal.sosfilt(top, rounded)
    return low_pass(mix)


dry = scene()
out = record(dry)
digitize_waveform(out)
```